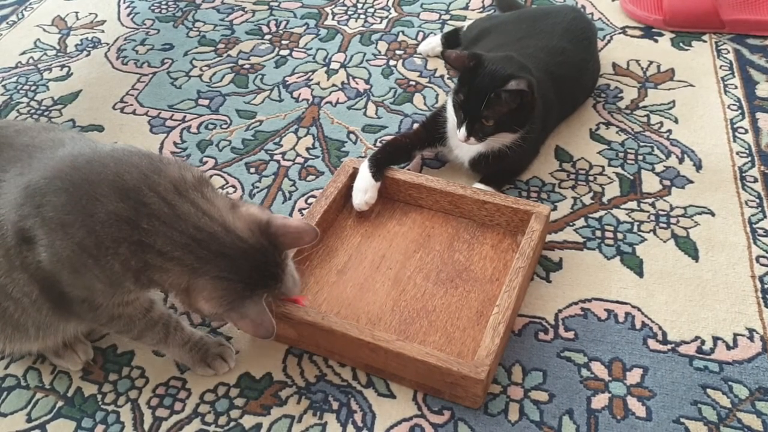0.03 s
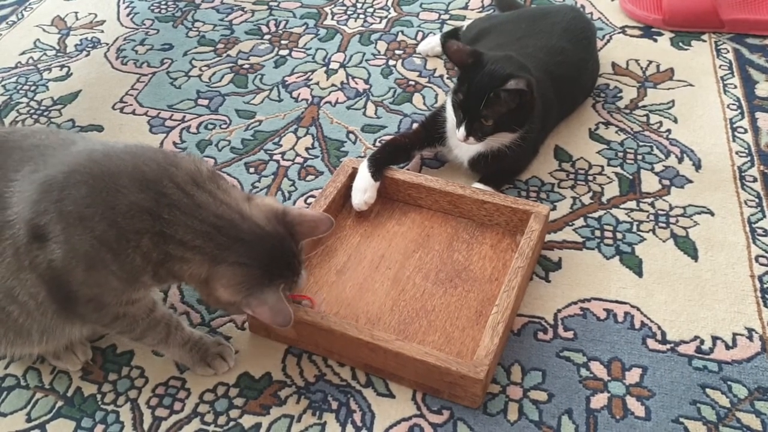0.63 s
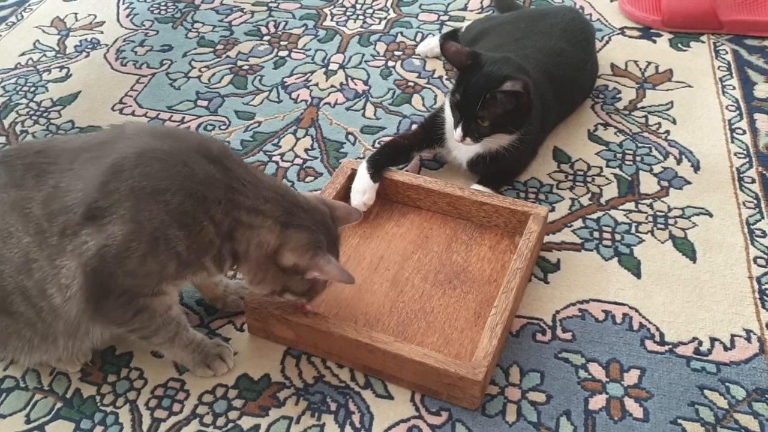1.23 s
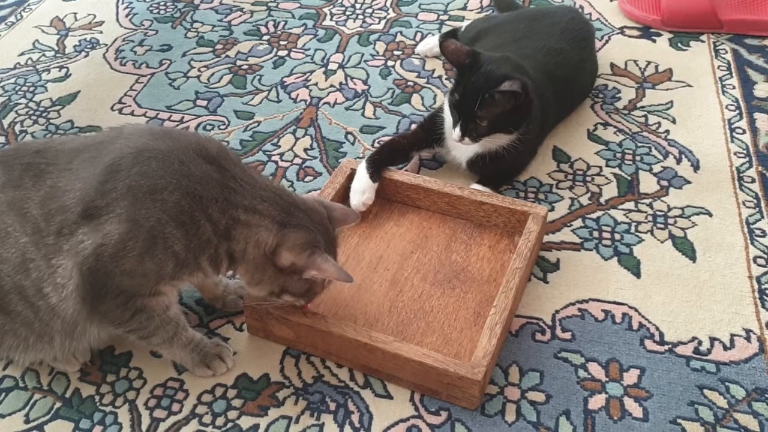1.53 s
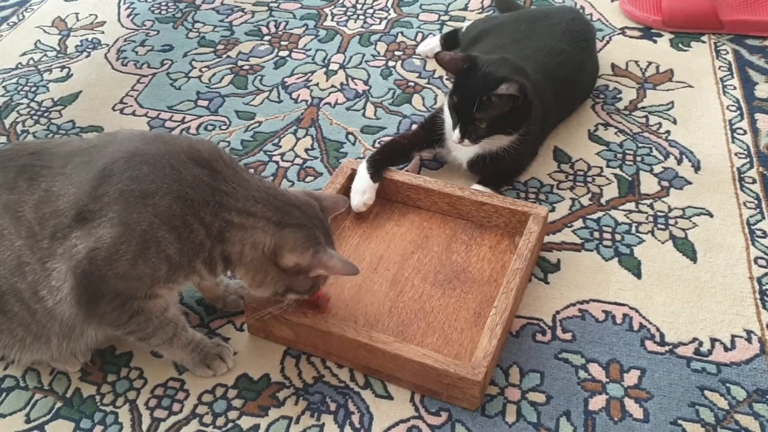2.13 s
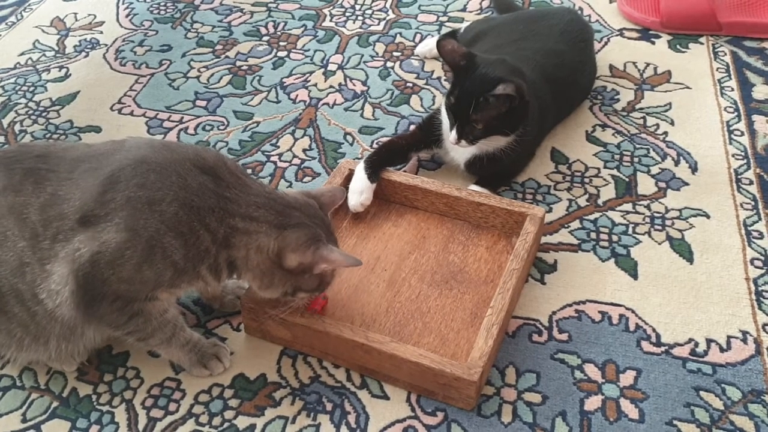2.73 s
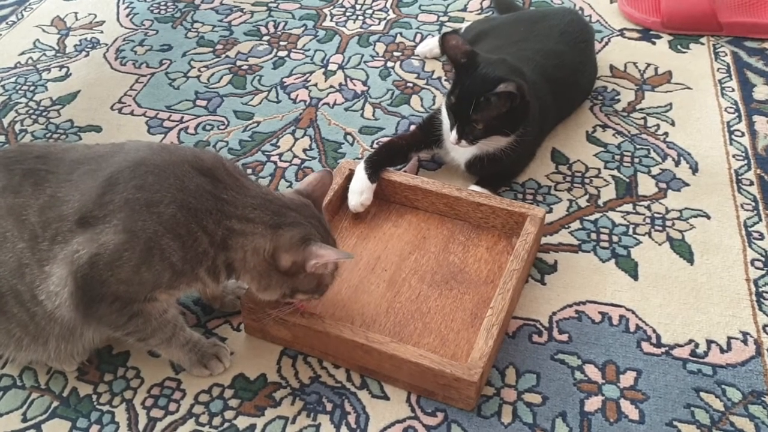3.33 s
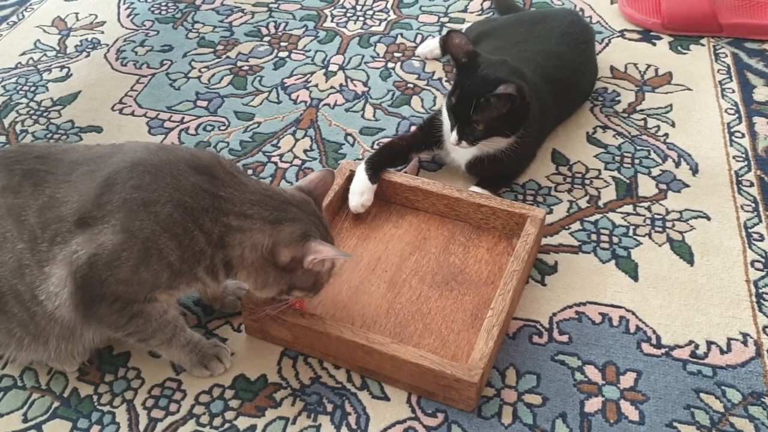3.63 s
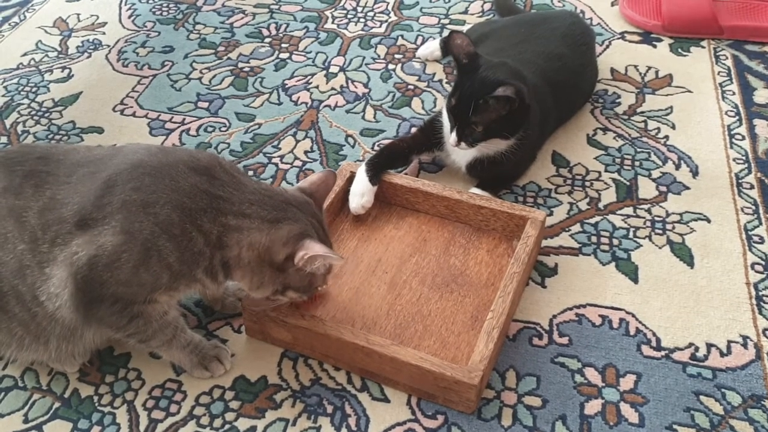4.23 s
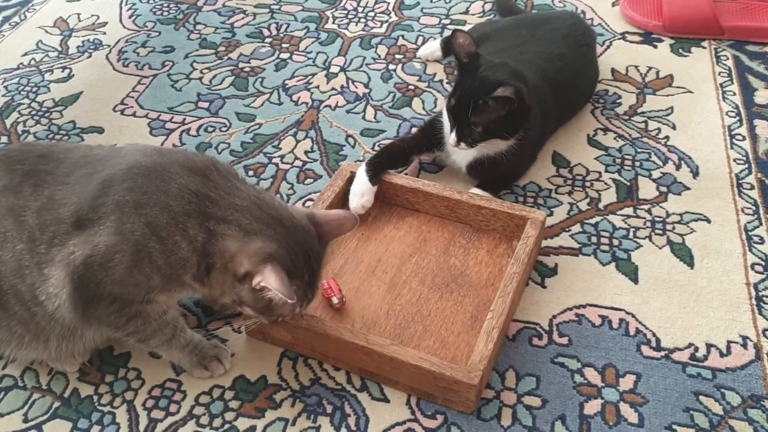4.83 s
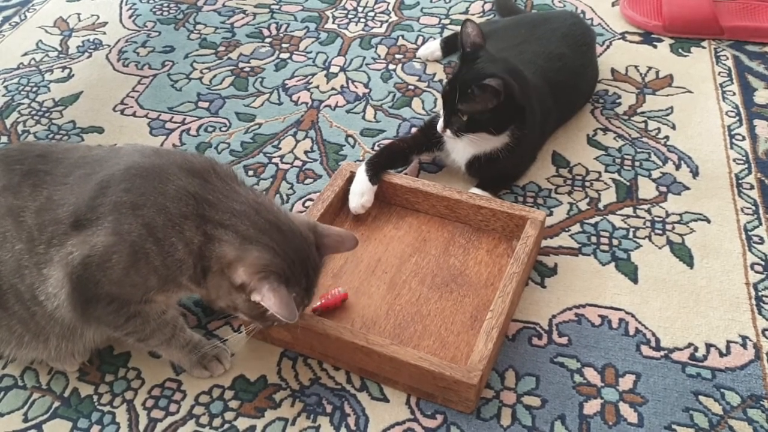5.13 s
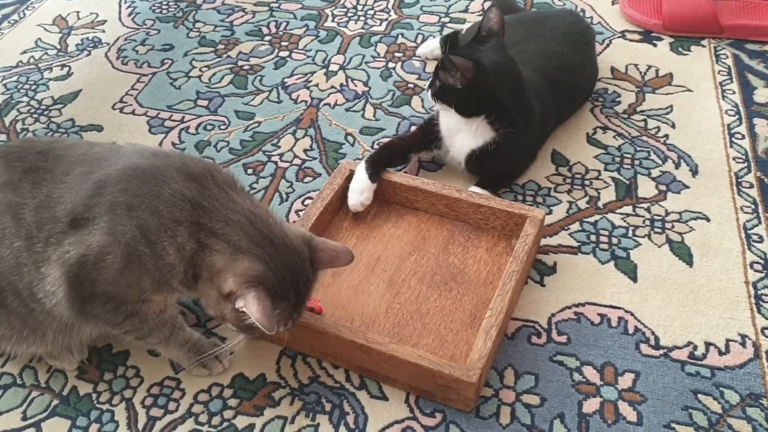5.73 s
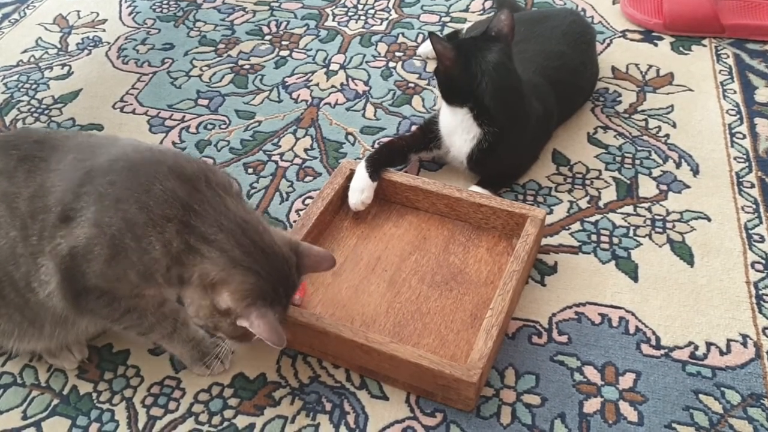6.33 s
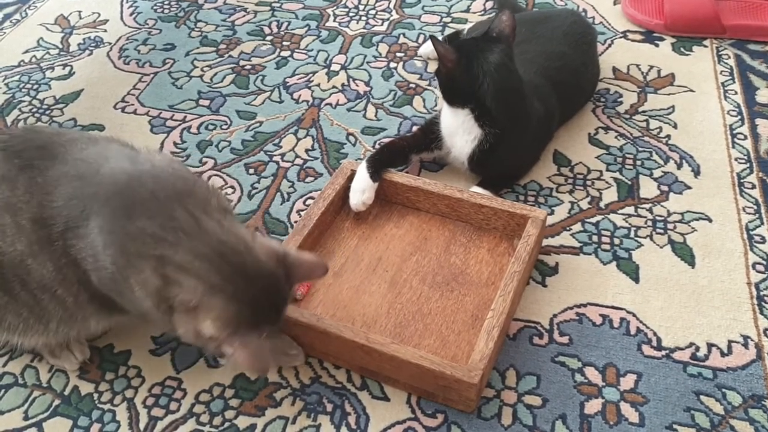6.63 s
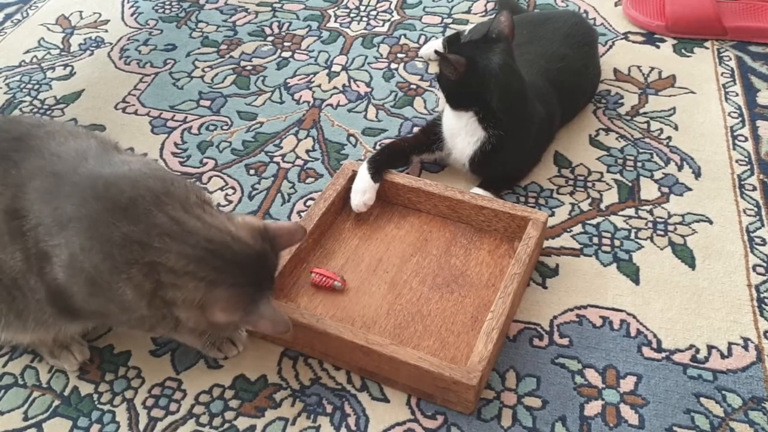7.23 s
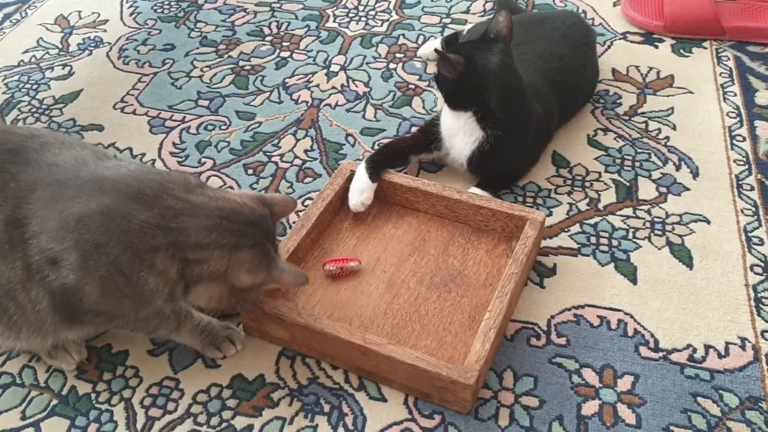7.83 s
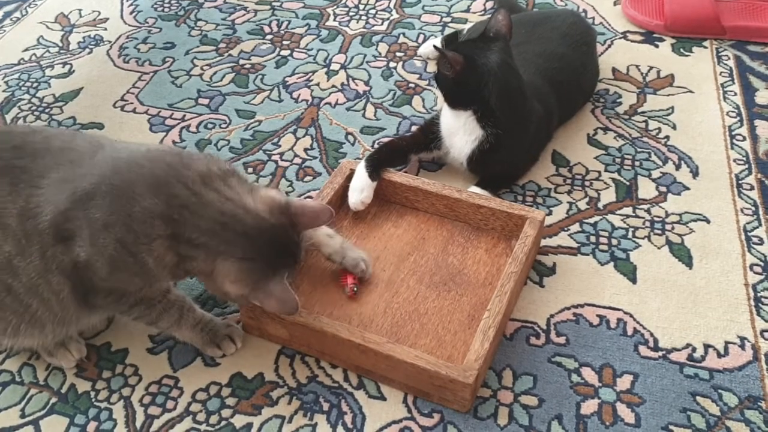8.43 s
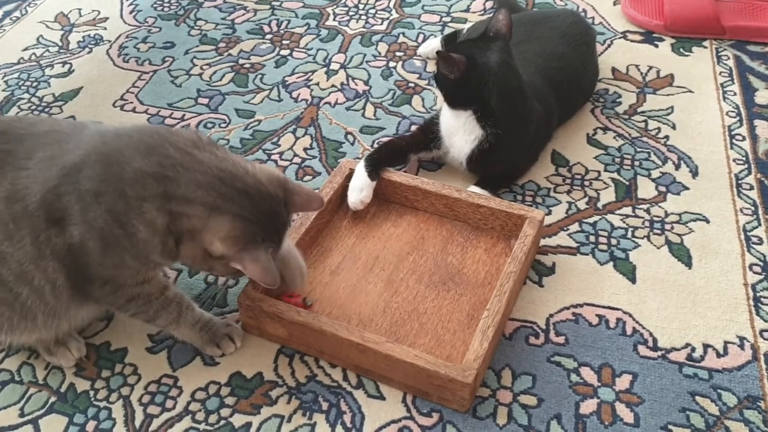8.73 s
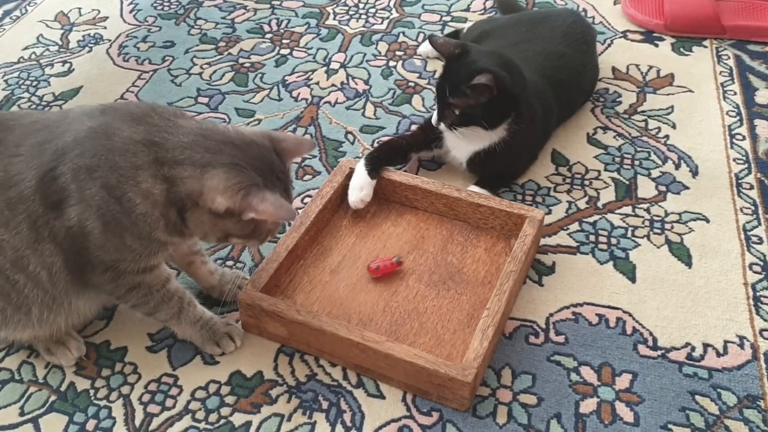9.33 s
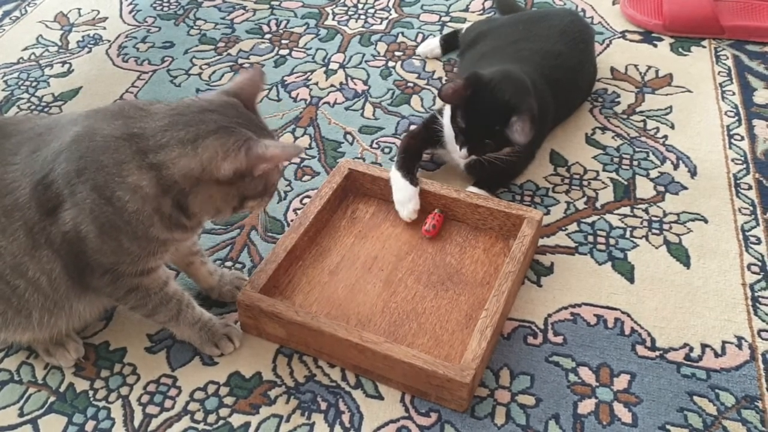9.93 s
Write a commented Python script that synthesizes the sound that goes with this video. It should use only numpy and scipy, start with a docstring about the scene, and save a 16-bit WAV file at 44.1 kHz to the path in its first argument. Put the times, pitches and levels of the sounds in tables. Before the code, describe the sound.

Light plastic ticking and a thin motor whirr as a tiny toy skitters over wood, with a few sharp knocks indoors.

```python
"""A thumb-sized vibrating toy skitters in a wooden tray on a carpet, in a room with a low hum.
From the start its motor whirrs near 150 turns a second, its legs hop on the thin floor and its
plastic shell ticks. A cat noses it, and it hits the rim twice in the first second. It clatters at
5 seconds and scuffs at 6.5, then the cat bats it hard against the rim at 8.4 and 8.7. At last the
hops fade and the toy glides, its motor slowing. The room rings for half a second after each blow."""
import sys
import numpy as np
from scipy import signal
from scipy.fft import rfft, irfft, next_fast_len
from scipy.io import wavfile
from scipy.ndimage import map_coordinates

SR = 44100
rng = np.random.default_rng(int(sys.argv[2]) if len(sys.argv) > 2 else 0)


def file_out(sig):
    """Save sig as 16-bit WAV at sys.argv[1]."""
    # one column per channel
    cols = np.atleast_2d(sig).T
    # limit, then scale
    lim = np.clip(cols, -1, 1)
    pcm = np.round(lim * 32767).astype(np.int16)
    wavfile.write(sys.argv[1], SR, pcm)


N = 441000

# Tone colours: how strong each pitch is in a sound. Each row: frequency in Hz, level in dB.
RUMBLE_COLOUR = [(20, -30), (31, -27), (41, 0.5), (52, -17.5), (72, -4.5), (84, 4.5), (93, -11.5),
                 (104, 6.5), (116, 2), (135, -9), (200, -11), (320, -16), (600, -21), (2500, -56)]   # the room's low rumble
BRUSH_COLOUR = [(2000, -5.5), (4400, -25), (6700, -41), (8200, 0.5), (9400, -10), (10300, 1.5), (12000, 14),
                (13700, -4), (14300, -30), (14800, -23), (16000, -43)]   # the brushes rubbing inside the motor
GLIDE_COLOUR = [(140, -12.5), (290, -17), (430, 5), (580, -1), (720, -6.5), (900, -22), (1500, -24),
                (3000, -67)]   # the tray under gliding legs
ROCKING_COLOUR = [(120, -12), (220, -8.5), (300, -2), (380, 0), (450, -8.5), (600, -15.5), (1500, -43)]   # the whole tray rocking
CHATTER_COLOUR = [(1500, -21.5), (2400, -5), (3000, 4), (3700, -3.5), (4000, 3), (4400, 7), (5400, -1.5),
                  (6200, -6), (6900, -23), (9000, -3), (16000, -50)]   # the loose plastic shell
FINE_CHATTER_COLOUR = [(3000, -30), (6900, -19), (7700, -2.5), (8400, -7), (9400, -18), (12200, -8.5),
                       (14000, -16), (14800, -40), (16000, -43)]   # its finer, higher chatter
FLOOR_THUD_COLOUR = [(120, -3), (250, -2.5), (420, 2), (560, -3), (680, 4), (820, 2), (930, -11.5),
                     (1250, -22), (2000, -69), (4000, -35)]   # the dull part of a landing
FLOOR_CLACK_COLOUR = [(500, -26.5), (900, -8.5), (1150, 3), (1400, 2), (1700, -3.5), (2000, -7.5),
                      (2500, -4.5), (3000, -9), (3600, -20.5), (4400, -16), (6500, -23), (15000, -51)]   # the sharp part of a landing
TICK_BODY_COLOUR = [(1500, -13), (2400, -31), (3000, -8), (3700, -0.5), (4000, -0.5), (4400, 9), (5300, -6),
                    (6200, -4.5), (6900, -12.5), (9000, -2.5), (16000, -31)]   # the body of a shell tick
TICK_EDGE_COLOUR = [(3000, -33), (6900, -12), (7700, -4), (8450, 9), (9400, -3.5), (10500, -0.5),
                    (12300, 8.5), (14000, -6), (16000, -5.5)]   # its bright edge
RIM_THUD_COLOUR = [(150, -25), (320, -2), (420, 2.5), (650, 6.5), (850, 4), (1200, 1.5), (3000, -100)]   # the dull part of a knock on the rim
RIM_CLACK_COLOUR = [(350, -15), (520, -6), (700, -1), (900, 2.5), (1200, 5.5), (1600, 0), (2000, -4),
                    (2500, -8.5), (2900, -8), (3500, -17.5), (4400, -11), (5500, -16), (12000, -37)]   # the hard wood of the rim
CRACK_COLOUR = [(1500, -14), (2400, -9), (2900, 3), (3400, -5), (4400, -0.5), (5300, -14.5), (6800, -15),
                (8300, -4.5), (9500, -12), (11500, -2), (14000, -8), (16000, -1)]   # the shell striking the rim

# How fast the motor spins. Each row: time in seconds, turns per second.
MOTOR_SPEED = [(0, 151), (3, 151), (6, 150), (7.2, 153), (8.3, 150), (8.9, 145), (9.6, 143), (10, 141.5)]
# Three bands where the motor's can (its case) rings. Each row: pitch in Hz, width in Hz, boost in dB.
CAN_BANDS = [(10550, 1500, 0), (12200, 970, 3), (13100, 840, 4.5)]
# Their levels as the toy turns. Each row: time in seconds, then lower, middle and upper band in dB.
CAN_LEVELS = [(0.0, -71, -65, -67), (0.64, -80, -68, -75), (0.86, -67, -64.5, -68), (1.39, -72, -66, -71),
              (1.78, -72, -68, -71), (2.09, -71, -65.5, -64), (2.56, -69, -68, -71), (2.81, -71, -62, -67),
              (3.06, -71, -68.5, -71), (3.9, -73, -64, -69), (4.43, -69, -60.5, -65),
              (4.9, -69, -67.5, -66), (5.32, -69, -61, -68), (5.88, -70, -68, -68), (6.6, -68, -64, -65),
              (6.91, -69, -61, -65), (7.41, -66.5, -60, -64), (7.82, -72, -62, -66),
              (8.22, -64.5, -64, -65), (8.52, -71, -69, -71), (8.91, -66.5, -67, -67),
              (9.47, -63, -63, -70), (9.66, -62.5, -59, -66), (10.0, -62, -63, -69)]
# Their pitch moves with the way the toy faces. Each row: time in seconds, shift in Hz.
CAN_PITCH_SHIFT = [(0, 150.5), (2, 99.5), (3.4, 149.5), (4.1, 100), (4.9, -250), (5.4, 101), (6.2, 200.5),
                   (6.8, 0.5), (7.7, -300), (8.3, -150), (9.2, -50), (9.8, 249.5)]
# How hard the gliding toy shakes the tray. Each row: time in seconds, level in dB.
GLIDE_LEVEL = [(0, -58), (0.5, -71), (1.5, -70), (4.5, -73), (5.1, -46.5), (5.6, -69), (7.5, -68),
               (8.2, -48.5), (8.8, -61.5), (9.1, -56.5), (9.5, -57.5), (10, -52)]
# The tray's low patter, strongest near the rim. Each row: time in seconds, level in dB.
ROCKING_LEVEL = [(0, -61), (.25, -53.5), (.55, -69), (.72, -53.5), (1.2, -58), (1.95, -47.5), (2.4, -60),
                 (3.05, -61.5), (3.4, -54.5), (3.85, -49), (4.1, -53.5), (5.0, -63), (6.0, -55.5),
                 (6.75, -49.5), (7.4, -62), (8.4, -59.5), (9.0, -73), (9.5, -61)]
# How loosely the shell shakes. Each row: time in seconds, coarse chatter in dB, fine chatter in dB.
CHATTER_LEVELS = [(0, -64.5, -69), (.33, -73, -71), (.5, -78.5, -81), (.8, -65, -64), (1.4, -68, -72),
                  (1.75, -77.5, -79), (2.0, -71, -69), (2.8, -66.5, -74), (3.5, -71, -74), (4.5, -73, -75),
                  (5.25, -69, -73), (5.8, -71, -71), (6.55, -68.5, -72), (7.4, -69.5, -79), (8.1, -69, -74),
                  (9.0, -69.5, -73), (9.35, -70.5, -73), (9.75, -75.5, -74), (10, -61, -72)]
# Light hops stop under the paw and fade as the toy glides.
# Each row: time in seconds, strongest thud in dB.
LIGHT_HOP_LEVEL = [(0, -45), (.27, -36), (.38, -46), (.6, -69), (.72, -39), (1.45, -36), (1.75, -38.5),
                   (2.0, -36), (3.2, -35.5), (3.85, -37), (5.2, -35), (6.45, -37.5), (6.8, -37), (7.1, -35),
                   (8.35, -38), (8.65, -38.5), (8.95, -44.5), (10, -59)]
# The hardest landings on the tray floor. Each row: start in seconds, thud in dB, clack in dB.
HARD_HOPS = [(0.159, -28.5, -38), (0.177, -37, -56), (0.25, -34, -61), (0.609, -37.5, -31.5),
             (0.635, -37.5, -43), (0.696, -22, -26), (0.735, -27, -25.5), (0.76, -25, -26.5),
             (0.786, -33, -25), (0.807, -26.5, -25), (0.833, -34, -40), (0.867, -31.5, -24.5),
             (0.892, -29.5, -28), (0.921, -33, -30), (0.928, -26.5, -19), (0.947, -28.5, -42),
             (1.001, -28.5, -25), (1.033, -29.5, -28.5), (1.06, -32.5, -49), (1.084, -33, -53),
             (1.173, -36, -53), (1.264, -27.5, -26), (1.322, -35, -36), (1.34, -33, -33), (1.354, -30, -29),
             (1.374, -28.5, -33), (1.392, -39, -49), (1.485, -36.5, -63), (1.582, -35.5, -66),
             (1.835, -31.5, -61), (1.873, -27.5, -54), (1.903, -35, -40.5), (2.007, -30, -46),
             (2.027, -32, -66), (2.153, -37.5, -67), (2.171, -36, -69), (2.189, -37, -68),
             (2.304, -36, -67), (2.483, -38.5, -61), (2.505, -33.5, -71), (2.618, -32, -50),
             (2.637, -32, -58), (2.703, -33.5, -70), (2.954, -32.5, -53), (3.094, -33.5, -70),
             (3.368, -36, -58), (3.423, -33, -50), (3.725, -34, -64), (3.753, -30.5, -48),
             (3.793, -34, -48), (3.843, -33.5, -62), (3.885, -28.5, -63), (3.911, -31.5, -42),
             (3.931, -35, -57), (4.127, -36.5, -70), (4.222, -35, -72), (4.262, -37.5, -72),
             (4.654, -35, -59), (4.695, -32.5, -70), (4.743, -32, -65), (4.788, -36, -68),
             (4.835, -33.5, -74), (4.89, -35.5, -72), (5.014, -29, -43), (5.037, -31, -66),
             (5.063, -28, -40), (5.088, -31, -38), (5.11, -31, -30), (5.13, -29, -31.5), (5.15, -28, -33),
             (5.169, -31, -59), (5.206, -26.5, -29.5), (5.225, -31.5, -46), (5.243, -30, -47),
             (5.268, -33, -37.5), (5.397, -34, -49), (5.456, -34.5, -68), (5.484, -34, -63),
             (5.528, -36, -70), (5.56, -35.5, -63), (5.774, -37, -59), (5.819, -33, -58), (5.909, -39, -64),
             (5.949, -37, -61), (5.983, -36, -65), (6.038, -33, -52), (6.193, -34.5, -62),
             (6.238, -35, -60), (6.593, -35.5, -51), (6.739, -36, -52), (6.818, -37, -69),
             (6.864, -38, -63), (6.913, -35.5, -53), (7.493, -36.5, -61), (7.656, -36.5, -61),
             (7.716, -32, -60), (7.806, -29, -48), (7.849, -31.5, -57), (7.868, -30.5, -57),
             (7.946, -36, -47), (7.973, -34.5, -48), (8.019, -31.5, -48), (8.047, -37, -44),
             (8.068, -33.5, -43), (8.101, -34, -46), (8.121, -37, -62), (8.154, -31, -47),
             (8.244, -27.5, -40), (8.278, -33.5, -76), (8.325, -33, -60), (8.354, -37, -60),
             (8.582, -37, -47), (8.605, -35, -47)]
# The floor's faint notes. Each row: pitch in Hz, strength in dB, seconds to fade by 60 dB.
FLOOR_NOTES = [(429.6, -36.5, 0.15), (607, -69, 0.18), (669, -44, 0.058), (815.3, -39, 0.16),
               (1083, -40.5, 0.14), (1413, -35, 0.12)]
# Shell ticks. Each row: start in seconds, body in dB, edge in dB, rattle length in seconds.
SHELL_TICKS = [(0.022, -49, -60, .045), (0.076, -48, -55, 0.014), (0.162, -49, -59, 0.0028),
               (0.196, -54, -47, .015), (0.251, -44.5, -48, 0.011), (0.336, -48.5, -57, 0.0031),
               (0.654, -45, -47, 0.0031), (0.762, -45, -45, .008), (0.785, -48, -42, 0),
               (0.855, -45, -49, .015), (0.927, -34, -34, 0), (1.087, -48, -47, 0),
               (1.264, -44, -51, 0.0044), (1.354, -45, -52, 0), (1.408, -48, -55, 0.02),
               (1.548, -56, -55, 0.07), (1.835, -47, -43, 0.0057), (1.876, -48.5, -52, 0.032),
               (1.967, -44, -39, 0), (2.117, -46, -41, 0.032), (2.244, -48.5, -56, 0.031),
               (2.34, -53.5, -53, 0.009), (2.46, -49, -45, 0.018), (2.579, -49.5, -55, 0.051),
               (2.692, -46.5, -49, 0.043), (2.748, -48, -58, 0.029), (2.8, -49, -63, 0.03),
               (2.859, -46.5, -58, 0.0033), (2.903, -48, -58, 0.056), (3.054, -49.5, -51, .04),
               (3.165, -52, -55, 0.035), (3.262, -52, -55, 0), (3.33, -54, -59, 0.052),
               (3.43, -54, -48, 0.0035), (3.588, -52.5, -55, 0.025), (3.671, -50, -45, 0.027),
               (3.753, -44, -47, 0.0082), (3.792, -46.5, -58, 0.027), (3.846, -47, -53, 0.0014),
               (3.912, -47.5, -43, 0.027), (4.118, -50, -47.5, 0.037), (4.316, -55, -51, 0.051),
               (4.404, -47, -42, 0.018), (4.451, -52.5, -46, 0.02), (4.592, -51, -50, 0),
               (4.61, -46, -39, .008), (4.686, -49, -46, 0.024), (4.726, -46, -45, 0.0016),
               (4.824, -51, -48, 0.046), (4.945, -50, -49, 0), (5.015, -46, -43.5, .025),
               (5.064, -47, -45, 0), (5.109, -42, -41, 0.012), (5.169, -45.5, -39.5, 0.013),
               (5.206, -45, -52, 0), (5.247, -45, -50, 0.019), (5.297, -49, -58, 0.0049),
               (5.397, -45, -45, 0.013), (5.484, -42, -41.5, 0), (5.51, -46.5, -49, 0.017),
               (5.645, -52, -50, 0.033), (5.741, -57, -48, 0.017), (5.88, -55, -48, 0.005),
               (5.984, -44, -43, 0), (6.021, -46, -48, 0.016), (6.099, -51, -56, 0.0026),
               (6.165, -55, -56, 0.0023), (6.195, -51, -49, 0), (6.22, -50.5, -54, 0),
               (6.348, -47, -45, 0.02), (6.448, -45, -45, 0.0051), (6.48, -44.5, -49, 0.025),
               (6.541, -47, -56, 0.002), (6.58, -47, -58, 0.016), (6.738, -47, -37, 0.01),
               (6.864, -48, -44, 0.045), (6.948, -51, -43, 0), (6.984, -48.5, -48, 0.027),
               (7.074, -52, -45, 0), (7.139, -49.5, -46, 0.026), (7.259, -47.5, -38, 0.0045),
               (7.332, -49.5, -39, 0), (7.415, -59, -46, 0), (7.475, -55, -39, 0), (7.506, -52.5, -41, 0),
               (7.553, -55, -40, 0), (7.656, -52, -38.5, 0.024), (7.717, -53, -41, 0),
               (7.778, -50, -40, 0.0059), (7.807, -47, -34, 0), (7.893, -46, -32, 0.0042),
               (7.975, -48.5, -45, 0.022), (8.019, -48, -55, 0.025), (8.068, -46.5, -53, 0),
               (8.102, -41.5, -40, 0), (8.28, -43, -39.5, .015), (8.346, -43, -47, 0.0077),
               (8.466, -47, -51, 0.012), (8.6, -49, -44, 0.038), (9.278, -51.5, -47, 0.02),
               (9.342, -50, -44, 0.0028), (9.4, -54, -58, 0.012), (9.435, -53.5, -54, 0.014),
               (9.723, -56.5, -54, 0), (9.8, -53, -58, 0), (9.909, -44, -37, 0.0035),
               (9.988, -45, -35.5, 0.004)]
# Blows on the rim. Each row: start in seconds, thud in dB, clack in dB, seconds between contacts,
# pitch of the struck spot in Hz, its strength against the clack in dB, shell crack in dB.
RIM_KNOCKS = [(0.2898, -37.5, -31.5, .0012, 1670, 3, -48), (0.292, -33, -20, .0012, 1660, -2, -38),
              (0.689, -33, -25.5, 0.0016, 1420, 5, -39), (6.496, -60, -38.5, 0.0016, 1420, -7, -46),
              (8.3727, -23, -30, 0.0014, 1200, 1, -43), (8.379, -33, -32, 0.0019, 1200, 0, -35),
              (8.382, -15.5, -11, 0.0017, 1240, -2, -23), (8.3838, -30, -25, 0.0019, 1560, 0, -22),
              (8.393, -39, -34, 0.00173, 1170, 7, -50), (8.3969, -44, -26, 0.002, 1120, 7, -55),
              (8.408, -44, -30, 0.00117, 1620, 4, -52), (8.701, -34, -40, 0.0009, 1310, 0, -48),
              (8.704, -28, -18, 0.0012, 1730, 8, -25)]
# The frame booms after a knock. Each row: pitch in Hz, strength in dB, seconds to fade by 60 dB.
FRAME_NOTES = [(415.5, -17, .2), (461.5, -18.5, 0.27), (567, -28.5, 0.17)]
# Scuffs on the wood. Each row: peak time in seconds, length in seconds, level in dB, low edge in Hz.
PAW_SCUFFS = [(6.535, 0.073, -68, 2180), (8.583, 0.05, -58, 3830), (8.627, 0.026, -53.5, 4850)]
# Echoes off the tray's walls. Each entry is a delay in seconds.
WALL_DELAYS_S = [.00055, .0009, .0014]
# The room's echo. Each row: frequency in Hz, level in dB, seconds to fade by 60 dB.
ROOM_ECHO = [(100, -12, 0.31), (387, -8.5, 0.6), (700, -7, 0.73), (1100, 0.5, 0.62), (2690, 2.5, 0.64),
             (4560, -2, 0.37), (9300, -3.5, 0.37), (15100, -21, 0.13)]

CROSSING_S = 0.001569   # a bending wave crosses the tray and returns


def from_db(db):
    """Turn decibels into a number to multiply by."""
    return 10 ** (np.asarray(db) / 20)


def rms_one(x):
    """Scale a signal so its average strength (rms) is 1."""
    return x / np.sqrt(np.mean(x ** 2) + 1e-20)


def in_time(rows):
    """Join a table's points with straight lines, giving each column a value at every sample."""
    s, *columns = np.transpose(rows)
    return [np.interp(np.arange(N) / SR, s, c) for c in columns]


def drift(rate_hz):
    """A smooth random wobble, about 1 in size."""
    r = np.exp(-80 * np.pi * rate_hz / SR)
    slow = signal.lfilter([1], [1, -2 * r, r * r], rng.standard_normal(N // 40 + 2002))[2000:]
    return np.interp(np.arange(N) / 40, np.arange(len(slow)), rms_one(slow))


def keep_band(x, order, hz, band):
    """Keep the lows, the highs or a band between; a higher order cuts more steeply."""
    return signal.sosfilt(signal.butter(order, hz, band, fs=SR, output="sos"), x)


def colour(x, spectrum, size=2048):
    """Give a signal a tone colour: each click becomes the promptest pulse with that colour."""
    hz, db = np.transpose(spectrum)
    log_hz = np.log(np.maximum(np.fft.rfftfreq(size, 1 / SR), 1))
    gains = from_db(np.interp(log_hz, np.log(hz), db))
    cepstrum = irfft(np.log(gains))
    cepstrum[1:size // 2] *= 2   # this folding moves the energy to the start of the pulse
    cepstrum[size // 2 + 1:] = 0
    pulse = irfft(np.exp(rfft(cepstrum)))
    return signal.oaconvolve(x, pulse / np.abs(pulse).max())[:N]


def clicks(times, gains):
    """One-sample clicks at the given times in seconds."""
    return np.bincount(np.clip(np.round(times * SR).astype(int), 0, N), gains, N + 1)[:N]


def hum_and_rumble():
    """Mains power hums while a low rumble swells and ebbs, nearly alike left and right."""
    level_db = -49.5
    shared, side = [rms_one(colour(rng.standard_normal(N), RUMBLE_COLOUR, size=16384)) for _ in range(2)]
    rumble = shared + from_db(-18.0) * side * np.array([[1], [-1]])
    rumble = rumble * from_db(level_db + 1.34 * drift(3.7))
    hum = from_db(level_db) * np.sin(2 * np.pi * 99.2 * np.arange(N) / SR + 0.45 * drift(2.2))
    return (rumble + hum) * from_db([[1.1], [-1.1]])


def motor_brushes(turns):
    """The brushes rub twice a turn, and the motor's can rings with their hiss in three shifting bands."""
    levels_db, shift_hz = in_time(CAN_LEVELS), in_time(CAN_PITCH_SHIFT)[0]
    pulsing = 1 + .2 * np.cos(2 * np.pi * turns) + .24 * np.cos(4 * np.pi * turns)
    hiss = rms_one(colour(rng.standard_normal(N), BRUSH_COLOUR))
    hiss = hiss * from_db(np.mean(levels_db, axis=0) + 1)
    for (hz, width_hz, boost_db), level_db in zip(CAN_BANDS, levels_db):
        slow_noise = keep_band(rng.standard_normal((2, N)), 3, width_hz / 2, "low")
        phase = 2 * np.pi * np.cumsum(hz + shift_hz + 60 * drift(1.8)) / SR
        band = slow_noise[0] * np.cos(phase) + slow_noise[1] * np.sin(phase)   # moved up to the pitch
        hiss = hiss + rms_one(band) * from_db(boost_db + level_db + drift(4))
    return pulsing * hiss


def glide(turns):
    """The motor's off-centre weight presses the legs down once a turn, never quite alike."""
    turn_starts = np.flatnonzero(np.diff(np.floor(turns))) / SR
    chance = rng.standard_normal((len(turn_starts), 2))
    pushes = clicks(turn_starts + .00026 * chance[:, 0], from_db(3 * chance[:, 1]))
    return rms_one(colour(pushes - pushes.mean(), GLIDE_COLOUR)) * from_db(in_time(GLIDE_LEVEL)[0])


def tray_rocking():
    """Soft random landings, about 200 a second, rock the whole tray."""
    landings = (rng.random(N) < 200 / SR) * from_db(2 * rng.standard_normal(N))
    patter = rms_one(colour(landings - landings.mean(), ROCKING_COLOUR))
    return patter * from_db(in_time(ROCKING_LEVEL)[0])


def shell_chatter(turns):
    """The loose shell makes thousands of tiny contacts a second, pulsing in step with the motor."""
    coarse_db, fine_db = in_time(CHATTER_LEVELS)
    flicker_db = 8 * np.tanh(1.4 * drift(20.3))
    pulsing = np.exp(0.5 * np.cos(2 * np.pi * turns)) * from_db(flicker_db)
    coarse, fine = rng.standard_normal((2, N)) * (rng.random((2, N)) < 9000 / SR) * pulsing
    return (rms_one(colour(coarse, CHATTER_COLOUR)) * from_db(coarse_db)
            + rms_one(colour(fine, FINE_CHATTER_COLOUR)) * from_db(fine_db))


def light_hops(turns):
    """The legs land every few turns. Each row: start in seconds, thud in dB, clack in dB."""
    flight_turns = np.maximum(np.round(3.2 * np.exp(.2 * rng.standard_normal(900))), 1)
    weakness_db = 12 * rng.random(900)
    s = np.interp(np.cumsum(flight_turns), turns, np.arange(N) / SR)
    thud_db = np.interp(s, *np.transpose(LIGHT_HOP_LEVEL)) - weakness_db
    nearest_hard_s = np.abs(s[:, None] - np.array(HARD_HOPS)[:, 0]).min(axis=1)
    can_land = nearest_hard_s > .012   # the toy is in the air just before and after a hard landing
    return np.column_stack([s, thud_db, thud_db - 22.5])[can_land & (s < s[-1])]


def crossings(times, db, strengths, scatter, uneven_db):
    """Each blow arrives, then returns from the tray's edges, a little uneven in time and strength."""
    chance = rng.standard_normal((len(times), 2, len(strengths)))
    delay_s = CROSSING_S * (np.arange(len(strengths)) + scatter * chance[:, 0])
    gains = from_db(db[:, None] + uneven_db * chance[:, 1]) * strengths
    return clicks((times[:, None] + delay_s).ravel(), gains.ravel())


def floor_hops(turns):
    """The toy lands on the floor: light landings mostly thud, hard ones add a brighter clack."""
    s, thud_db, clack_db = np.vstack([HARD_HOPS, light_hops(turns)]).T
    thud = crossings(s - .0005, thud_db, [.8, .85, .8], scatter=0.065, uneven_db=2.0)
    hard_db, split_hz = -27.5, 1530   # clacks softer than hard_db lose treble above split_hz
    treble_db = clack_db + np.clip(clack_db - hard_db, -12, 0)
    rebound_s = s + .016 * rng.uniform(.3, 1.2, len(s))   # the toy grazes the wood again
    clack = 0
    for db, band in [(clack_db, "low"), (treble_db, "high")]:
        blows = crossings(s, db, [.9, .85, .8], scatter=0.11, uneven_db=2.5)
        rebounds = crossings(rebound_s, db - 12, [1, 1, 1], scatter=0.4, uneven_db=3.5)
        clack = clack + keep_band(blows + rebounds, 3, split_hz, band)
    return colour(thud, FLOOR_THUD_COLOUR), colour(clack, FLOOR_CLACK_COLOUR)


def wood_ringing(blows, notes):
    """Every blow leaves the wood ringing briefly at its own notes."""
    ringing = 0
    for hz, db, fade_s in notes:
        decay, angle = from_db(-60 / (fade_s * SR)), 2 * np.pi * hz / SR
        gain = from_db(db) / (2 * np.pi)
        feedback = [1, -2 * decay * np.cos(angle), decay * decay]
        ringing = ringing + signal.lfilter([gain, 0, -gain], feedback, blows + 1e-18)
    return ringing


def rattles():
    """A tick may repeat about once a turn, fading. Each row: start in seconds, body and edge in dB."""
    rows, chances = [], rng.standard_normal((len(SHELL_TICKS), 2, 16))
    for (s, body_db, edge_db, length_s), chance in zip(SHELL_TICKS, chances):
        turn_s = 1 / np.interp(s, *np.transpose(MOTOR_SPEED))
        rows.append((s, body_db, edge_db))
        for k in range(1, min(int(length_s / turn_s), 15) + 1):
            loss_db = 8.5 * k * turn_s / length_s + 2 * chance[0, k]
            rows.append((s + turn_s * (k + 0.18 * chance[1, k]), body_db - loss_db, edge_db - loss_db))
    return np.array(rows)


def shell_ticks():
    """Jolts make the shell tick in a short spray of contacts that swells and dies."""
    s, body_db, edge_db = rattles().T
    swell_s, ticks = 0.0013, 0
    age = np.arange(1024) / (swell_s * SR)
    for db, spectrum in [(body_db, TICK_BODY_COLOUR), (edge_db, TICK_EDGE_COLOUR)]:
        spray = signal.oaconvolve(clicks(s, from_db(db)), 2 * age * np.exp(-age))[:N]
        ticks = ticks + spray * rms_one(colour(rng.standard_normal(N), spectrum))
    return ticks


def rim_knocks():
    """The toy hits the thick rim in a quick stutter: a thud, a clack and the struck spot's brief note."""
    thud, clack, spot = 0, 0, 0
    spot_width_hz = 220   # so wide that the note dies at once
    for s, thud_db, clack_db, gap_s, spot_hz, spot_db, _ in RIM_KNOCKS:
        thud = thud + clicks(s + CROSSING_S * np.arange(3), from_db(thud_db) * np.array([1, .8, .3]))
        gaps_s = gap_s * np.exp(0.043 * rng.standard_normal(3))
        blow = clicks(s + np.cumsum(np.r_[0, gaps_s]), from_db(clack_db) * np.array([.91, .44, .15, .12]))
        clack = clack + blow
        spot_filter = signal.iirpeak(spot_hz, spot_hz / spot_width_hz, fs=SR)
        spot = spot + from_db(spot_db) * signal.lfilter(*spot_filter, blow + 1e-18)
    return colour(thud, RIM_THUD_COLOUR), colour(clack, RIM_CLACK_COLOUR), colour(spot, RIM_CLACK_COLOUR)


def shell_cracks():
    """At each blow on the rim the shell gives one hard, bright crack."""
    s, *_, db = np.transpose(RIM_KNOCKS)
    decay_s = 0.0024
    bursts = signal.lfilter([1], [1, -np.exp(-1 / (decay_s * SR))], clicks(s, from_db(db)) + 1e-18)
    return bursts * rms_one(colour(rng.standard_normal(N), CRACK_COLOUR))


def scuffs():
    """Paw and toy rub over the wood in short swells of tiny clicks."""
    t, swells = np.arange(N) / SR, 0
    grains = rng.standard_normal(N) * (rng.random(N) < 4000 / SR)
    for peak_s, length_s, db, low_hz in PAW_SCUFFS:
        rub = rms_one(keep_band(grains, 2, [low_hz, low_hz * 1.38], "band"))
        swells = swells + rub * from_db(db) * np.exp(-(2 * (t - peak_s) / length_s) ** 2)
    return swells


def place(x, pan_db, lag):
    """Split into left and right: the left is pan_db louder, the right is lag samples late."""
    size = next_fast_len(N + 64)
    delay = np.exp(-2j * np.pi * np.fft.rfftfreq(size) * lag)
    late = irfft(rfft(x, size) * delay, size)[:N]
    return np.array([x * from_db(pan_db / 2), late * from_db(-pan_db / 2)])


def tray_walls(x, db):
    """Echoes off the tray's walls change their paths as the toy travels, so the hiss slowly swirls."""
    echoes = np.zeros((2, N))
    for side in echoes:
        for delay_s in WALL_DELAYS_S:
            lag = (delay_s + .00004 * drift(.25)) * SR
            side += map_coordinates(x, [np.arange(N) - lag], order=3)
    return from_db(db) * echoes


def room(x):
    """The room's many echoes blur together, unlike left and right, and die away band by band."""
    t = np.arange(int(.7 * SR)) / SR
    log_hz = np.log(np.fft.rfftfreq(len(t), 1 / SR) + 1)
    band_log_hz = np.log(np.array(ROOM_ECHO)[:, 0])
    onset = np.clip((t - .004) / .004, 0, 1)
    noise, tail = rfft(rng.standard_normal((2, len(t)))), 0
    for (_, db, fade_s), this_band in zip(ROOM_ECHO, np.eye(len(ROOM_ECHO))):
        band = irfft(noise * np.interp(log_hz, band_log_hz, this_band), len(t))
        decay = from_db(-60 * t / fade_s) * onset
        tail = tail + from_db(db) * band * decay / np.linalg.norm(decay)
    return signal.fftconvolve(x[None], tail, axes=1)[:, :N]


def wandering_room(x):
    """The moving toy's sound reaches the walls by changing paths, so it swings between two echoes."""
    angle = 2 * np.pi * 3 * np.arange(N) / SR
    return room(x * np.cos(angle)) + room(x * np.sin(angle))


def scene():
    """Toy and tray close by, with the room around them."""
    turns = np.cumsum(in_time(MOTOR_SPEED)[0] * (1 + 0.00736 * drift(3.77))) / SR   # turns so far
    motor = motor_brushes(turns)
    plastic = shell_chatter(turns) + shell_ticks() + shell_cracks() + scuffs()
    background = hum_and_rumble()
    floor_thud, floor_clack = floor_hops(turns)
    rim_thud, rim_clack, spot = rim_knocks()
    thud, clack = floor_thud + rim_thud, floor_clack + rim_clack
    floor_ring = wood_ringing(thud + from_db(-9.5) * clack, FLOOR_NOTES)
    frame_ring = wood_ringing(from_db(-16) * (rim_thud + rim_clack), FRAME_NOTES)
    wood = thud + floor_ring + frame_ring + glide(turns) + tray_rocking()
    wood = keep_band(wood, 1, 200, "high")   # a small tray gives off little deep bass
    direct = (place(wood, pan_db=1.6, lag=1.6) + place(clack + spot, pan_db=4.0, lag=2.74)
              + place(plastic, pan_db=-3.5, lag=1.5) + place(motor, pan_db=-4.0, lag=1.0))
    # the struck spot beams its sound, so little of it goes into the room's echo
    echo = wandering_room(wood + clack + from_db(-11.5) * spot + plastic + motor)
    return direct + tray_walls(plastic + motor, db=-17.0) + echo + background


def record(dry):
    """Cut the highest treble steeply, above 15850 Hz."""
    return signal.sosfilt(signal.ellip(10, .2, 70, 15850, fs=SR, output="sos"), dry)


dry = scene()
out = record(dry)
file_out(out)
```